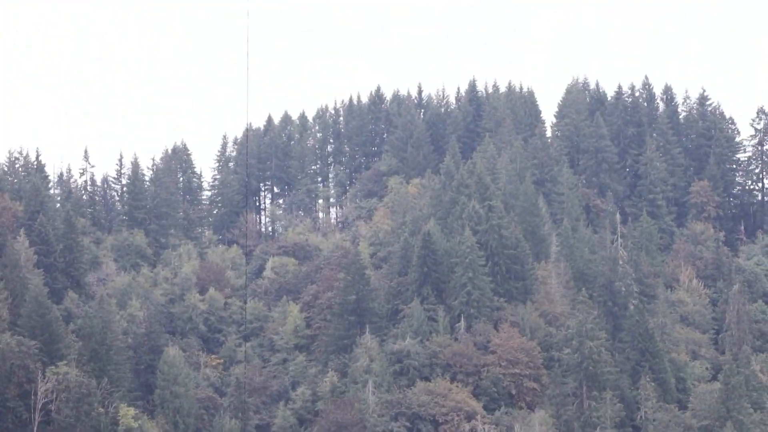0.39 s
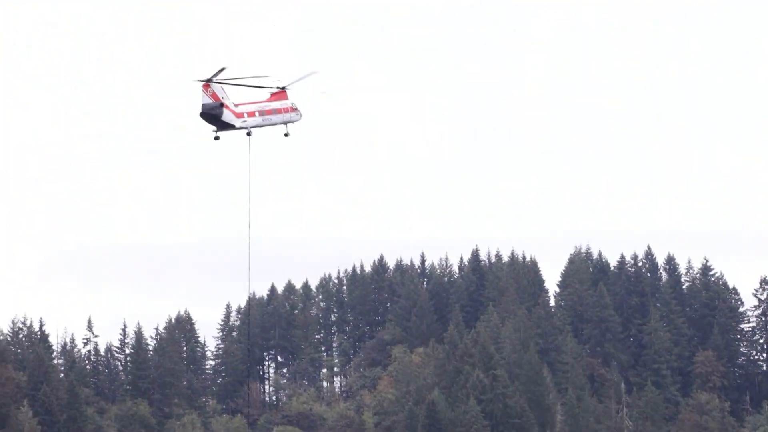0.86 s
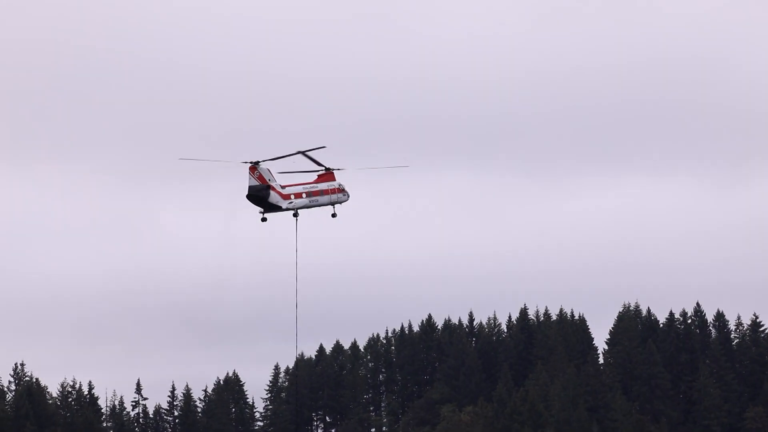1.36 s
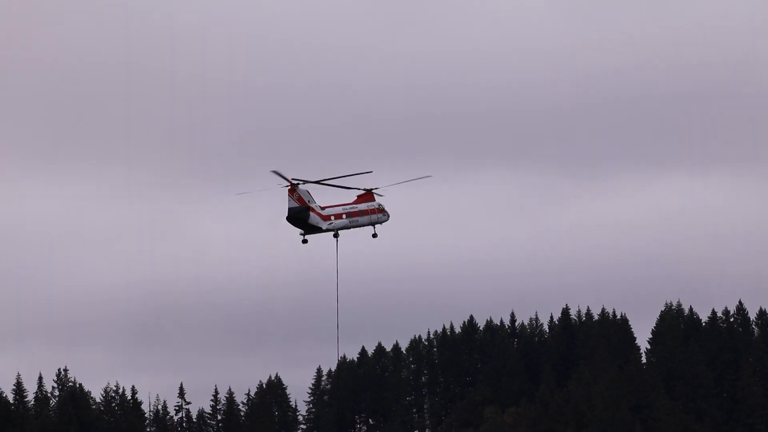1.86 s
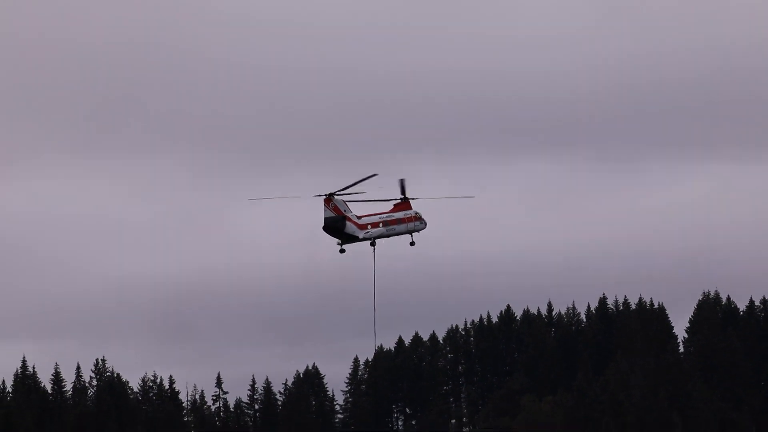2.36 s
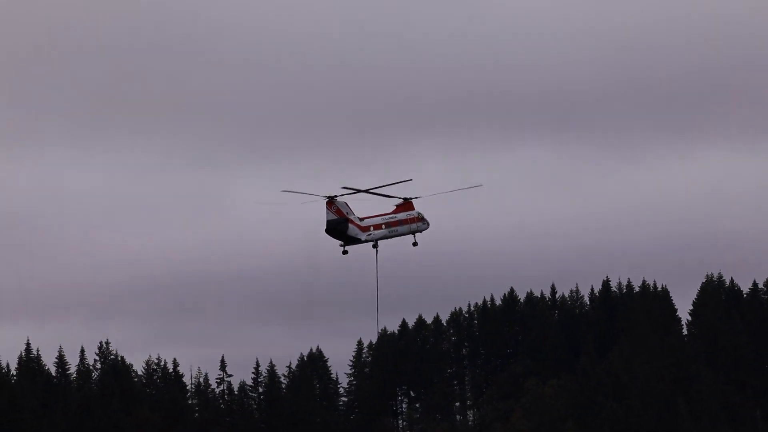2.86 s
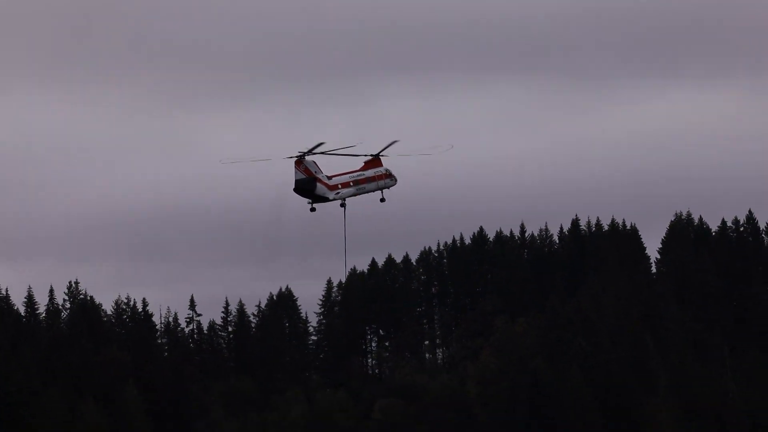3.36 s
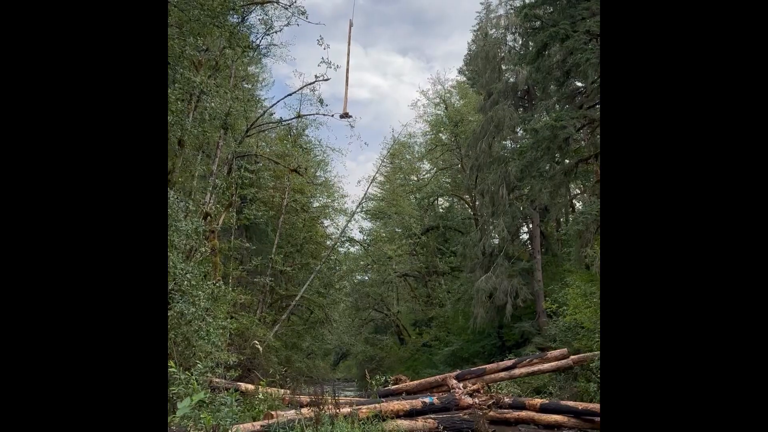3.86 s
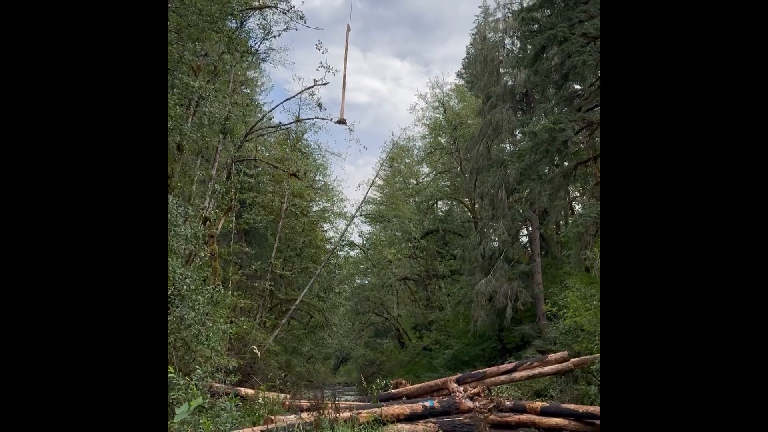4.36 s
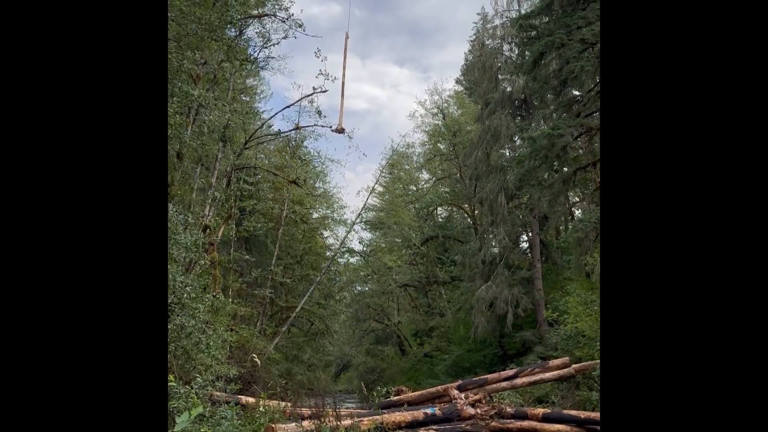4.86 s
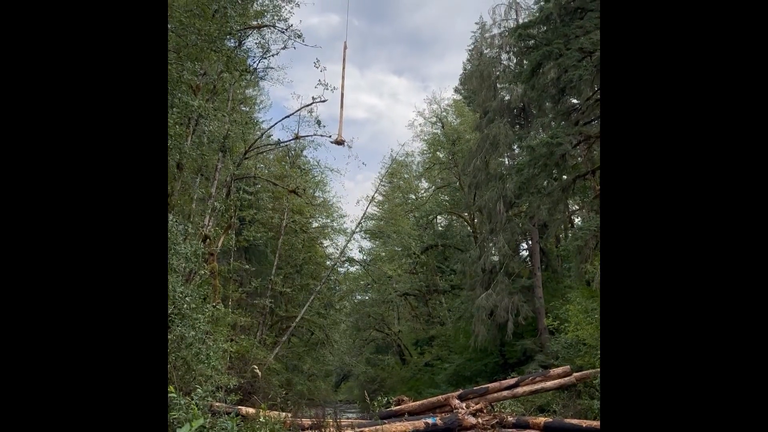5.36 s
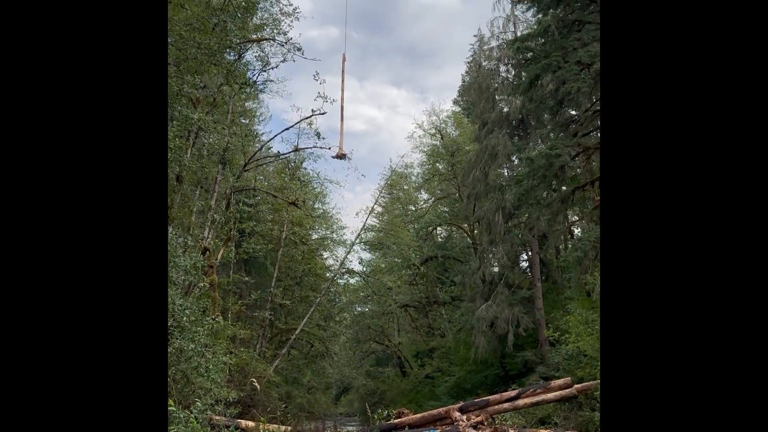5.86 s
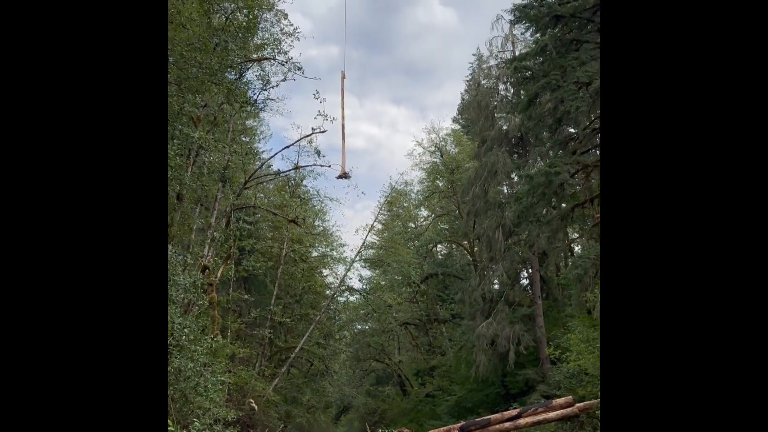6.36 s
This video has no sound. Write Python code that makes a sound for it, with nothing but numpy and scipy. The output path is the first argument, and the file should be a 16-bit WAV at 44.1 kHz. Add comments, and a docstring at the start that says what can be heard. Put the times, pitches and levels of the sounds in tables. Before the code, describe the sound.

Dry, echoing rotor slaps about thirteen times a second from afar, then with a click a huge bassy helicopter roar directly above, with turbine hiss and gear whine.

```python
"""Wooded slope: a twin-rotor helicopter hovers far off, in mono, its blade slaps echoed by the ground over soft roar.
A hard cut jumps to a spot right below it, in stereo: blade-rate tones, throbbing roar, turbine hiss, gear whine.
Slaps are pressure pulses with noise bursts; roar and hiss are flickering noise bands; tones are wavering
cosines; whine is wandering sines, joined by drifting narrow noise when near. A few treble ticks stand out."""
import sys
import numpy as np
from scipy import signal
from scipy.fft import rfft, irfft
from scipy.io import wavfile
from scipy.ndimage import uniform_filter1d

SR = 44100
rng = np.random.default_rng(int(sys.argv[2]) if len(sys.argv) > 2 else 0)


def undo_db(level):
    """Turn decibels back into plain size, where 20 dB means ten times bigger."""
    steps = np.asarray(level, float) / 20
    return 10 ** steps


def wav_record(signal):
    """Record a signal, one row per channel, as 16-bit PCM in the file named by sys.argv[1]."""
    frames = np.transpose(np.atleast_2d(signal))
    bounded = np.clip(frames, -1, 1)
    # unit amplitude maps onto the largest positive 16-bit level
    quanta = np.round(bounded * 32767).astype(np.int16)
    wavfile.write(sys.argv[1], SR, quanta)


N = 296352

TIME = np.arange(N) / SR
HZ = np.fft.rfftfreq(N, 1 / SR)
OCT = np.log2(np.maximum(HZ, 1))
CUT_S = 3.45045
FAR_BLADE_HZ, NEAR_BLADE_HZ = 13.037, 13.182
FAR_FIRST_S, NEAR_FIRST_S = 0.071, 3.539  # first regular slap of each view


def curve(table):
    """Columns of a time table, one value per sample."""
    s, *columns = np.transpose(table)
    return [np.interp(TIME, s, c) for c in columns]


def colour(points):
    """dB of a (Hz, dB) spectrum at every bin, interpolated over octaves."""
    hz, db = np.transpose(points)
    return np.interp(OCT, np.log2(hz), db)


def unit(shape_db):
    """Shift a colour so that its noise has rms 1."""
    return shape_db - 10 * np.log10(np.mean(undo_db(2 * shape_db)))


def bell(hz, octaves):
    """Smooth band around hz on a log axis."""
    return np.exp(-0.5 * ((OCT - np.log2(hz)) / octaves) ** 2)


def band(x, lo_hz, hi_hz, order=2):
    """Band-pass."""
    return signal.sosfilt(signal.butter(order, [lo_hz, hi_hz], "band", fs=SR, output="sos"), x)


def walk(rate_hz):
    """Random levels held about 1 / rate_hz seconds and smoothed twice; spread near 1."""
    control_hz = 500
    k, steps = int(control_hz / rate_hz), N * control_hz // SR + 2
    held = np.repeat(rng.standard_normal(steps // k + 1), k)
    smooth = uniform_filter1d(uniform_filter1d(held, k), k)
    return 1.3 * np.interp(TIME * control_hz, np.arange(len(held)), smooth)


def echo(x, ms, db):
    """The sound alone, later by ms and scaled by db."""
    k = int(ms * SR / 1000)
    return undo_db(db) * np.concatenate([np.zeros(k), x[:-k]])


def scatter(x, samples, fade_s):
    """Trees smear a sound: convolution with fading noise."""
    tail = rng.standard_normal(samples) * np.exp(-np.arange(samples) / SR / fade_s)
    return signal.fftconvolve(x, tail)[:N]


def burst(noise, t, rise_s, fall_s, lo_hz, hi_hz, order):
    """Noise under a quick swell and fade, rung through a band; its energy is set by the envelope alone."""
    shape = np.exp(-np.abs(t) / np.where(t < 0, rise_s, fall_s))
    rung = band(noise * shape, lo_hz, hi_hz, order)
    return rung * np.sqrt(np.sum(shape ** 2) / np.sum(rung ** 2))


def beat(first_s, end_s, blade_hz, strike, scatter_db, snap_db):
    """One slap per passing blade, each a little off the trend; a hard slap replaces any beat it meets."""
    # Each row: start in seconds, thump level in dB, crack level in dB, crack pitch in Hz, snap level in dB.
    hard_slaps = [(0.071, -19, -33, 795, -36), (0.145, -17, -20.5, 615, -37),
                  (0.225, -18.5, -28.5, 800, -46), (0.299, -16, -20, 900, -33),
                  (0.377, -16.5, -27, 815, -34), (0.531, -21, -30, 1100, -50),
                  (0.605, -21, -23.5, 810, -34.5), (0.684, -19.5, -25.5, 790, -35),
                  (0.761, -18, -29, 696, -40), (0.836, -23, -24.5, 790, -40), (0.912, -19, -23, 960, -32),
                  (1.372, -22.5, -28, 760, -32.5), (1.45, -18, -20.5, 605, -46),
                  (1.525, -23, -24.5, 624, -43), (1.602, -21.5, -24, 647, -38),
                  (1.755, -25, -23.5, 690, -36), (1.835, -34, -21.5, 980, -34),
                  (1.913, -20, -18.5, 1250, -37), (1.988, -25, -21, 1150, -40), (2.066, -22, -15, 930, -29),
                  (2.14, -27, -17.5, 930, -32), (2.219, -26, -15, 770, -43), (2.297, -22, -20, 900, -31),
                  (2.371, -29, -25, 796, -51), (2.449, -28, -20.5, 706, -42), (2.525, -21, -25.5, 865, -34),
                  (2.68, -26, -28, 884, -36), (2.754, -20, -27.5, 1050, -39), (2.832, -24, -26.5, 900, -35),
                  (2.986, -24.5, -31, 700, -46), (3.295, -22.5, -24, 620, -38), (3.835, -11, -19, 695, -50),
                  (4.196, -7, -25, 560, -33), (4.228, -11, -33, 560, -51), (4.301, -8, -30, 560, -52),
                  (4.572, -15.5, -26, 580, -52), (4.72, -21, -30, 580, -52), (4.641, -9, -22.5, 650, -49),
                  (5.361, -11.5, -18.5, 636, -54), (5.664, -20, -16.5, 570, -44),
                  (5.741, -8, -16, 704, -30.5), (5.815, -21, -17.5, 640, -37), (5.858, -27, -28, 690, -50),
                  (5.92, -12, -29, 570, -52), (6.121, -18, -13, 570, -38), (6.348, -8.5, -17, 595, -35),
                  (6.422, -21, -21.5, 960, -30)]
    jitter_s, hz_scatter_oct, snap_db_per_oct = 0.00073, 0.22, 7
    s = np.arange(first_s, end_s, 1 / blade_hz)
    chance = np.sqrt(3) * rng.uniform(-1, 1, (len(s), 5)).T  # rms 1
    at, *trend = np.transpose(strike)
    thump_db, crack_db, hz = (np.interp(s, at, c) for c in trend)
    hz = hz * 2 ** (hz_scatter_oct * chance[0])
    # higher cracks snap more
    snap_db = crack_db + snap_db + snap_db_per_oct * np.log2(hz / 700) + scatter_db * chance[1]
    s = s + jitter_s * chance[2]
    thump_db = thump_db + scatter_db * chance[3]
    crack_db = crack_db + scatter_db * chance[4]
    rows = np.transpose([s, thump_db, crack_db, hz, snap_db])
    for hard in hard_slaps:
        if first_s - 0.01 < hard[0] < end_s:
            clear = np.abs(rows[:, 0] - hard[0]) > 0.3 / blade_hz
            rows = np.vstack([rows[clear], hard])
    return rows


def slaps():
    """Blades strike the wake: a three-lobed pressure thump, a rough crack and a snap of treble."""
    # Each row: time in seconds, thump level in dB, crack level in dB, crack pitch in Hz.
    far_strike = [(0.0, -19, -28, 734), (0.35, -19.5, -26, 840), (0.9, -18, -29, 835),
                  (1.15, -26.5, -27, 770), (1.5, -5, -29, 600), (1.76, -28, -29, 710), (2.4, -11, -34, 830),
                  (2.7, -25.5, -26, 950), (3.1, -32, -29, 710), (3.44, -21, -30, 645)]
    near_strike = [(3.46, -22, -16, 560), (3.78, -15, -17, 550), (3.96, -21, -23, 620),
                   (4.25, -15, -42, 520), (4.7, -18, -23, 600), (5.251, -32.5, -31, 604),
                   (5.9, -32, -37, 614), (6.3, -23, -22, 580), (6.72, -39, -20, 740)]
    # Thump pitch. Each row: time in seconds, spectral peak in Hz.
    thump_pitch = [(0.0, 224), (1.0, 243), (1.6, 327), (2.6, 320), (3.44, 273), (3.46, 278), (6.72, 288)]
    thump, crack, snap = np.zeros((3, N))
    # last two: scatter in dB, snap in dB below a 700 Hz crack
    rows = np.vstack([beat(FAR_FIRST_S, CUT_S, FAR_BLADE_HZ, far_strike, 1.2, -11),
                      beat(NEAR_FIRST_S, TIME[-1000], NEAR_BLADE_HZ, near_strike, 3.5, -32.5)])
    t = np.arange(-300, 900) / SR
    grit = rng.standard_normal((len(rows), 2, len(t)))
    shock = 4 * np.exp(-(t / 0.00006) ** 2)  # a shock front in the fizz
    for (s, thump_db, crack_db, hz, snap_db), (rough, fizz) in zip(rows, grit):
        at = slice(int(s * SR) - 300, int(s * SR) + 900)
        turn = (np.pi * np.interp(s, *np.transpose(thump_pitch)) * t) ** 2
        thump[at] += undo_db(thump_db) * (1 - 2 * turn) * np.exp(-turn)
        crack[at] += undo_db(crack_db) * burst(rough, t + 0.0015, 0.0015, 0.0034, hz / 1.9, hz * 1.6, order=4)
        snap[at] += undo_db(snap_db) * burst(fizz + shock, t, 0.0006, 0.003, 900, 7500, order=2)
    return 0.97 * thump, crack, snap


def tones(orders, phase, start, waver_db, waver_rad):
    """Multiples of the blade rate; moving air makes the phase of the higher ones waver more."""
    out = 0
    for i, (k, db) in enumerate(orders):
        level = np.sqrt(2) * undo_db(db + waver_db * walk(3.535))
        out = out + level * np.cos(k * phase + start[i] + waver_rad * k * walk(2.026))
    return out


def roar(shape_db, table, throb_db, flicker_db, swell_db, notches=1, chop_db=0):
    """Turbulent air in half-octave steps: bands flicker, the low ones most; middle ones swell and throb most."""
    level_db, bright = curve(table)
    spectrum = rfft(rng.standard_normal(N)) * undo_db(shape_db) * notches
    swell, out = swell_db * (walk(15) + walk(22)), 0
    for centre in np.arange(4.5, 14, 0.5):  # log2 of Hz
        air = irfft(spectrum * np.clip(1 - 2 * np.abs(OCT - centre), 0, 1), N)
        share = np.exp(-0.5 * ((centre - 9.2) / 2.5) ** 2)
        gain_db = flicker_db * (1 + 0.36 * (centre < 9.5)) * walk(36)
        gain_db = gain_db + share * (swell + throb_db) + chop_db * (centre > 12)
        gain_db = gain_db + bright * max(centre - np.log2(500), 0)
        out = out + air * undo_db(gain_db)
    return out * undo_db(level_db)


def far_whine():
    """Gear tone and its lower sideband: sines wandering in level and phase."""
    out = 0
    for hz, db in zip([3123, 3101], [-65.5, -70.5]):
        out = out + undo_db(db + 2 * walk(6)) * np.sin(2 * np.pi * hz * TIME + 1.1 * walk(14))
    return out


def far(thump, crack, snap):
    """Distant hover: slaps doubled by the ground and smeared by the trees, over hum, whine and roar."""
    # Blade-rate tones. Each row: multiple of the blade rate, level in dB.
    orders = [(1, -80), (2, -76), (3, -71), (4, -68), (5, -76), (6, -75), (7, -72), (8, -67)]
    # Each row: time in seconds, level in dB, brightness in dB per octave above 500 Hz.
    roar_course = [(0.0, -34, 0.5), (0.59, -35.5, 0.5), (1.94, -36, 0.5), (2.13, -33, -0.5),
                   (2.9, -36, 0.5), (3.38, -35.5, 0), (3.44, -35.5, 0.5)]
    # Roar spectrum. Each row: frequency in Hz, relative density in dB.
    roar_colour = [(15, -32), (25, -56), (69, -29), (118, -5.5), (145, 2), (223, -1.5), (288, -0.5),
                   (381, -6.5), (560, -5.5), (907, -8), (1590, -14), (1950, -18.5), (2270, -18),
                   (3770, -34.5), (6960, -44), (11000, -66), (14300, -71), (22000, -120)]
    phase = 2 * np.pi * FAR_BLADE_HZ * (TIME - FAR_FIRST_S)
    crack = 0.82 * crack + 1.5 * band(snap, 1200, 2800, order=2)  # distance dulls the snap
    tip = undo_db(-17.5) * band(snap, 2900, 7000, order=2)  # only its sharp tip keeps some treble
    crack = 0.8 * (crack + echo(crack, 1.7, -4))  # a slope close by colours it
    throb_db = 3 * np.exp(4 * (np.cos(phase - 0.5) - 1))
    trees = scatter(thump + crack, 6000, 0.058)
    blades = thump + echo(thump, 6.49, -2) + crack + echo(crack, 7.1, -14) + undo_db(-45.5) * trees
    blades = band(blades, 125, 5000, order=3)  # small microphone, far air
    hum = tones(orders, phase, 0.8 * np.arange(len(orders)), 1.2, 0.03)
    air = roar(unit(colour(roar_colour)), roar_course, throb_db, 0.9, 0.8)
    return blades + tip + hum + far_whine() + air


def wake():
    """Level in dB that jumps at each blade of the front and rear rotor and fades; mean of the jumps 0."""
    # Each row: time in seconds, jump scale in dB.
    depth = [(3.46, 2.5), (5.0, 11.5), (6.72, 9)]
    fade_s, rear_lag_s, rear_share = 0.089, 0.035, 0.35

    def fade(lag_s):
        since_s = (TIME - NEAR_FIRST_S + 0.003 - lag_s) % (1 / NEAR_BLADE_HZ)
        return np.exp(-since_s / fade_s)

    jumps = fade(0) + rear_share * fade(rear_lag_s)
    jumps = uniform_filter1d(jumps, size=SR // 250)
    return curve(depth)[0] * (jumps - jumps.mean())


def near_tones(phase, lag, arrival_db):
    """Deep blade-rate tones in slow surges; the pulse arrivals set how they line up."""
    # Each row: multiple of the blade rate, relative level in dB.
    orders = [(1, -69), (2, -64), (3, -51), (4, -50), (5, -41), (6, -42), (7, -36.5), (8, -40), (9, -35),
              (10, -33), (11, -43), (12, -43), (13, -44), (14, -38), (15, -35), (16, -42), (17, -37),
              (18, -40), (19, -40), (20, -41), (21, -47), (22, -48), (23, -43), (24, -42), (25, -43),
              (26, -45), (27, -42), (28, -44)]
    # Each row: time in seconds, surge level in dB (-24.5 leaves the tones unscaled).
    surges = [(3.46, -17.5), (3.68, -29.5), (3.78, -25), (3.92, -22.5), (4.4, -28), (4.54, -25.5),
              (4.67, -29), (5.06, -25.5), (6.15, -30), (6.72, -22.5)]
    start = [np.angle(np.sum(undo_db(arrival_db) * np.exp(-1j * k * lag))) - 1.4 for k, _ in orders]
    return tones(orders, phase, start, 2.5, 0.04) * undo_db(curve(surges)[0] + 24.5)


def rasp():
    """Gear rasp: narrow noise on a drifting centre; it flares at each blade and flickers."""
    # Each row: time in seconds, level in dB, centre in Hz.
    course = [(3.46, -54.5, 2684), (3.75, -60.5, 2865), (4.1, -61, 2950), (4.4, -64, 2880),
              (4.6, -58, 2800), (4.8, -60, 2678), (4.95, -59, 2750), (5.15, -68, 2850), (5.7, -60, 3000),
              (6.2, -62, 3060), (6.72, -72, 3030)]
    width_hz = 250
    db, hz = curve(course)
    low = signal.butter(2, width_hz / 2, fs=SR, output="sos")
    slow = signal.sosfilt(low, rng.standard_normal((2, N)))
    turn = 2 * np.pi * np.cumsum(hz) / SR
    noise = slow[0] * np.cos(turn) + slow[1] * np.sin(turn)
    return noise / noise.std() * undo_db(db + 1.2 * wake() + 4 * walk(35))


def near_whine():
    """Gear whine: a sine with wandering phase whose level flickers and jumps with the blades."""
    # Each row: time in seconds, level in dB.
    course = [(3.47, -58), (3.62, -56), (3.8, -61), (4.05, -64), (4.2, -57), (4.42, -64), (4.65, -54),
              (4.85, -59), (5.1, -63), (5.3, -60), (5.69, -58), (5.92, -60), (6.05, -65), (6.2, -60),
              (6.4, -61), (6.7, -68)]
    whine_hz = 3149.5
    level_db = curve(course)[0] + 2.2 * walk(35) + 1.5 * walk(70) + 1.5 * wake()
    return np.sqrt(2) * undo_db(level_db) * np.sin(2 * np.pi * whine_hz * TIME + 1.1 * walk(35))


def near(thump, crack, snap):
    """Right below: strong tones and roar, notched by the ground echo, wide in the treble."""
    # Blade pulses from both rotors and the slopes. Each row: delay into the blade cycle in ms, level in dB.
    arrivals = [(12, 0.5), (43, 8.5), (56, -0.5), (73, 1.5)]
    # Each row: time in seconds, level in dB, brightness in dB per octave above 500 Hz.
    roar_course = [(3.46, -16.5, 0.28), (3.7, -16.5, 0.082), (3.9, -17.5, 0.42), (4.15, -17.5, 0.32),
                   (4.4, -18, 0.21), (4.7, -18, 0.22), (4.9, -19.5, 0.12), (5.1, -19.5, 0.17),
                   (5.35, -21, 0.1), (5.6, -20, 0.087), (5.85, -21.5, 0.39), (6.1, -18.5, 0.13),
                   (6.35, -19.5, 0.081), (6.55, -17, 0.05), (6.72, -18.5, 0.054)]
    # Roar spectrum. Each row: frequency in Hz, relative density in dB.
    roar_colour = [(15, -61), (25, -26.5), (50, -13), (110, 1.5), (212, 3), (288, -8.5), (344, -3),
                   (456, -6.5), (603, -14.5), (1110, -22), (1800, -35.5), (3080, -39), (4990, -43.5),
                   (6780, -53), (9200, -54.5), (11000, -73.5), (14300, -128), (22000, -120)]
    # Humps and dips of roar and turbine hiss. Each row: centre in Hz, width in octaves, gain in dB.
    humps = [(70, 1, 1), (162.3, 0.073, -16), (2450, 0.066, -4), (1150, 0.24, -0.5), (5120, 0.069, -6.5),
             (6680, 0.13, 7.5)]
    # Stereo width of the roar. Each row: frequency in Hz, side-minus-mid trend in dB.
    side_colour = [(60, -21), (110, -19), (200, -15), (380, -12), (700, -3), (1290, -1), (2380, 0),
                   (4400, -2), (8120, -6.5), (15000, 11)]
    hiss_chop_db, ground_s = 2, 0.0098
    phase = 2 * np.pi * NEAR_BLADE_HZ * (TIME - 3.47)
    ms, arrival_db = np.transpose(arrivals)
    lag = 2 * np.pi * NEAR_BLADE_HZ * ms / 1000
    hum = near_tones(phase, lag, arrival_db)

    # the roar jumps at each arrival; the blades chop the hiss
    throb_db = wake()
    for angle, db in zip(lag, arrival_db):
        throb_db = throb_db + 1.28 * undo_db(db) * np.exp(9 * (np.cos(phase - angle) - 1))
    chop_db = hiss_chop_db * np.exp(3 * (np.cos(phase - lag[0]) - 1)) + 1.1 * walk(30)
    notches = 1 - 0.63 * bell(580, 0.9) * np.exp(-2j * np.pi * HZ * ground_s)
    shape = unit(colour(roar_colour)) - 2.5 + sum(db * bell(hz, width) for hz, width, db in humps)

    crack = 0.5 * crack + 0.78 * band(snap, 400, 4700, order=1)
    crack = crack + undo_db(-28) * scatter(crack, 3000, 0.015)
    whine = near_whine() + rasp()
    thump = band(thump, 250, 1400, order=1)
    thump = echo(thump, 1.5, 0)  # the low push trails the snap
    thump = thump + echo(thump, 3.85, -1.2) + echo(thump, 6.83, -1.3)  # ground and logs throw it back
    mid = hum + 0.94 * thump + crack + whine
    mid = mid + roar(shape, roar_course, throb_db, 1.28, 0.72, notches, chop_db)

    # two microphone ports share the bass; their cavities lean left near 700 Hz, right near 1300 Hz
    lean = 0.38 * bell(650, 0.35) - 0.4 * bell(1290, 0.3) - 0.08 * bell(90, 1.6)
    lean = lean + 0.3j * bell(800, 1.1) + 0.55j * bell(6000, 0.9)
    side = irfft(rfft(mid) * lean, N) + echo(whine + crack, 0.4, -4)
    wide = shape + colour(side_colour) - 5 * bell(70, 1.2) - 1.2 * bell(800, 1.1)
    side = side + roar(wide, roar_course, throb_db, 1.2, 2.1, 1, chop_db)
    return band(np.array([mid + side, mid - side]), 38, 9800, order=4)


def ticks():
    """Thin ticks close to the microphones: brief noise bursts banded at 5 to 8.8 kHz."""
    # Each row: time in seconds, level in dB.
    events = [(3.8884, -43), (3.9429, -53), (5.1694, -51), (5.6286, -48)]
    out, t = np.zeros(N), np.arange(-100, 400) / SR
    for (s, db), grit in zip(events, rng.standard_normal((len(events), len(t)))):
        at = slice(int(s * SR) - 100, int(s * SR) + 400)
        out[at] += undo_db(db) * burst(grit, t, 0.0006, 0.003, 5000, 8800, order=6)
    return out


def scene():
    """The far view cuts hard to the near one; the step in pressure clicks."""
    blades = np.array(slaps())
    before = TIME < CUT_S
    since_s = TIME - CUT_S
    step = undo_db(np.array([[-11], [-8.5]])) * ~before  # left, right
    step = step * np.exp(-np.abs(since_s) / 0.0012) * (1 - since_s / 0.003)
    rise = np.clip(np.minimum(since_s / 0.0012, (TIME[-1] - TIME) / 0.004), 0, 1)  # also fades the end
    return np.where(before, far(*blades * before), rise * near(*blades)) + ticks() - step


def band_limit(x):
    """A steep low-pass at the top of the band."""
    return signal.sosfilt(signal.butter(12, 17000, fs=SR, output="sos"), x)


def record(dry):
    """The recorder rounds the loudest peaks and cuts the top."""
    top = signal.ellip(10, 0.2, 80, 16850, fs=SR, output="sos")
    mix = signal.sosfilt(top, 0.67 * np.tanh(dry / 0.72))
    return band_limit(mix)


dry = scene()
out = record(dry)
wav_record(out)
```